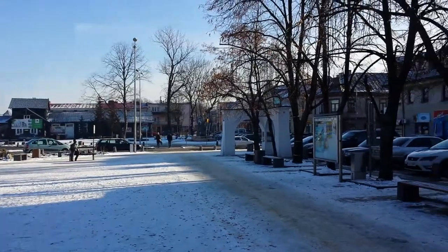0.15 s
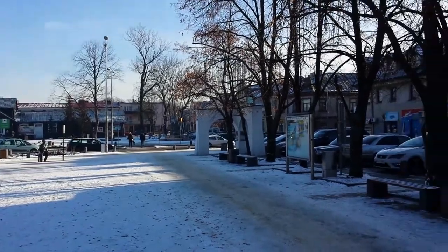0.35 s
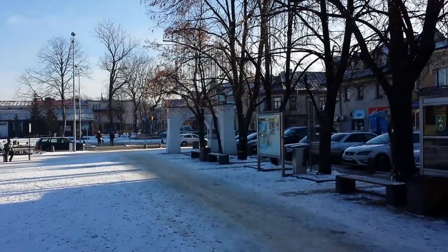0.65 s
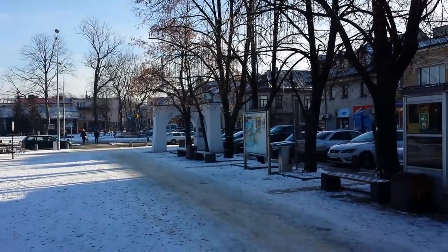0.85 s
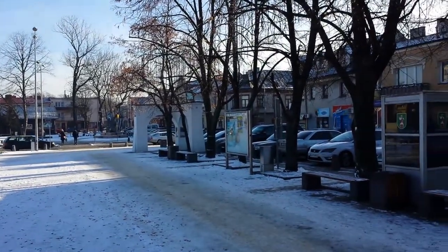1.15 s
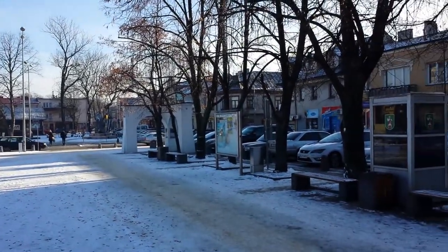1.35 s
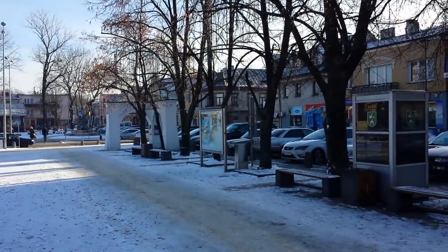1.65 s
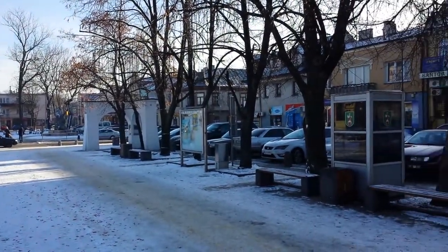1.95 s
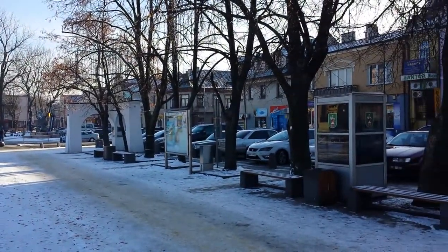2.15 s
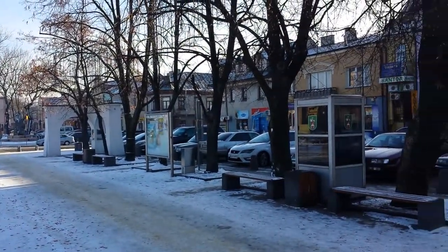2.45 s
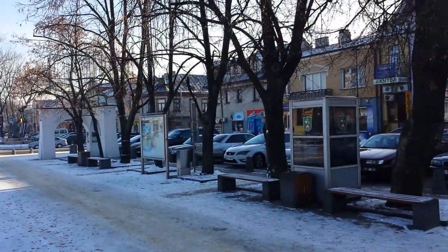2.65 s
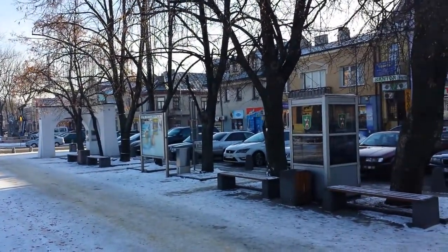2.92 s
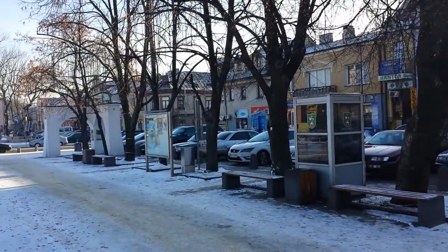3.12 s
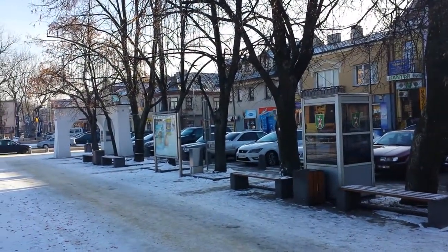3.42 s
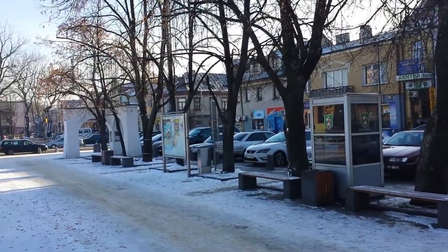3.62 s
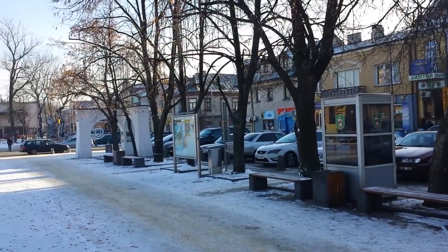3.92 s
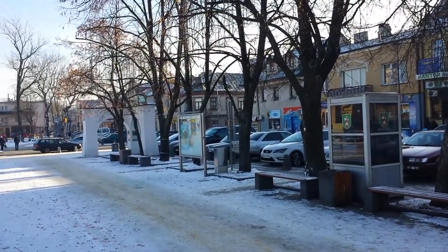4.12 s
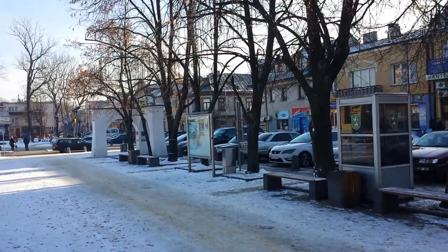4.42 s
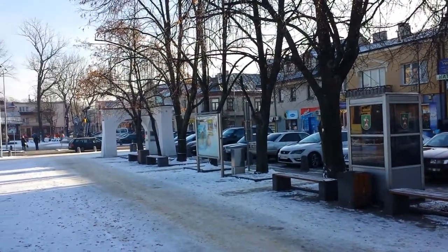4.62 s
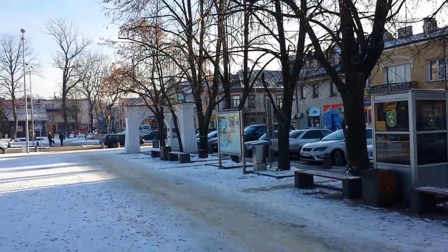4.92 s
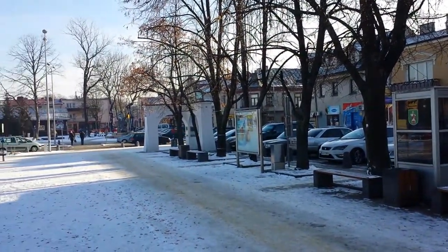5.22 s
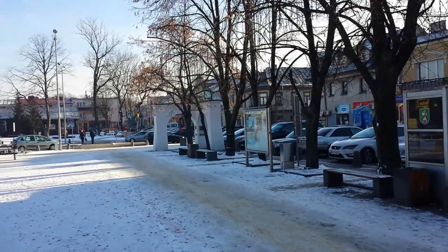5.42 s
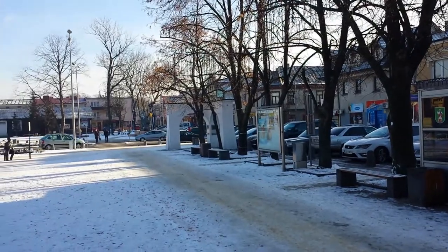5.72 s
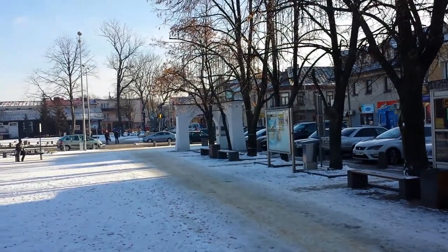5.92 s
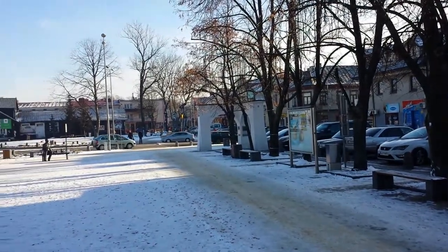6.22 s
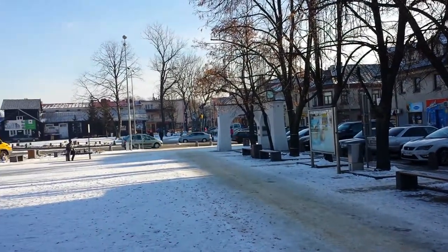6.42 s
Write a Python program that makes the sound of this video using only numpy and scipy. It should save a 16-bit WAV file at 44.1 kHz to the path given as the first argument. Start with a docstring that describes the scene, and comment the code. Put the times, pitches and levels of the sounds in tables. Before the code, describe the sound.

Soft steady road traffic rumbles beyond a snowy square while wind buffets the microphone mid-way and a small bird chips brightly near the end.

```python
"""Road traffic rumbles and hisses beyond a snowy town square: shaped noise, with wavering tones for engines.
Puffs of wind buffet the two microphone ports of a hand-held camera as lumpy noise; single eddies slap them.
A tit on the right repeats a quick low-high-low call of gliding chips, with echoes from the square.
Far-off jackdaws yelp and small birds whistle in gliding or fluttering tones.
Fine noise hisses, the camera whirrs in pulses of high noise, and a dry double tick snaps nearby."""
import sys
import numpy as np
from scipy import signal
from scipy.fft import rfft, irfft
from scipy.io import wavfile
from scipy.ndimage import uniform_filter1d

SR = 44100
rng = np.random.default_rng(int(sys.argv[2]) if len(sys.argv) > 2 else 0)


def generate_wav(signal):
    """Clip the signal to [-1, 1] and save it as 16-bit WAV at the path in sys.argv[1]."""
    frames = np.transpose(np.atleast_2d(signal))
    scaled = np.clip(frames, -1, 1) * 32767
    pcm = np.round(scaled).astype(np.int16)
    wavfile.write(sys.argv[1], SR, pcm)


N = 289799
TIME = np.arange(N) / SR
BINS = np.maximum(np.arange(N // 2 + 1) * SR / N, 1)   # frequencies of the spectrum, Hz
TREES_T60_S = 0.93   # time in which the scatter behind the small birds fades by 60 dB


def from_db(db):
    """Turn decibels into a gain."""
    return 10 ** (np.asarray(db) / 20)


def rms_one(x):
    """Scale to an rms (average strength) of 1."""
    return x / np.sqrt(np.mean(x ** 2) + 1e-20)


def over_hz(rows):
    """Join up each column of a table along log frequency."""
    hz, *columns = np.transpose(rows)
    return np.array([np.interp(np.log(BINS), np.log(hz), column) for column in columns])


def filtered(x, hz, kind, order=2):
    """Keep only part of the frequency range, with a Butterworth filter."""
    sections = signal.butter(order, np.clip(hz, 10, .45 * SR), kind, fs=SR, output="sos")
    return signal.sosfilt(sections, x + 1e-18)


def drift(rate_hz):
    """Smooth random wander with an rms of 1; a higher rate wanders faster."""
    spectrum = rfft(rng.standard_normal(N))
    return rms_one(irfft(spectrum / (1 + (BINS / rate_hz) ** 2), N))


def tone_phase(hz):
    """Add up a changing pitch into the phase of a tone."""
    return 2 * np.pi * np.cumsum(hz) / SR


def diffuse(spectrum):
    """Noise from all round: ports a hand's length apart hear mid tones in opposite phase."""
    # how alike the two ports sound: f/Hz, left-right correlation (1 same, -1 opposite)
    likeness = [(30, .7), (330, .72), (600, .45), (850, .25), (1100, -.05), (1450, -.6), (1900, .3),
                (2200, .4), (2650, .08), (3450, .25), (4200, -.2), (5000, 0), (15000, 0)]
    mid, side = rfft(rng.standard_normal((2, N)))
    alike = np.clip(over_hz(likeness)[0], -1, 1)
    shared = np.sqrt((1 + alike) / 2) * mid
    opposed = np.sqrt((1 - alike) / 2) * side * [[1], [-1]]
    return irfft((shared + opposed) * from_db(over_hz(spectrum)) * np.sqrt(SR / 2), N)


def gate(start, length, edge):
    """A window in time with soft edges."""
    opening = np.tanh((TIME - start) / edge)
    closing = np.tanh((TIME - start - length) / edge)
    return (opening - closing) / 2


def square_scatter(x, t60):
    """Scatter from trunks and house fronts: a fading noise tail, different at each port."""
    t = TIME[:SR]
    tail = rng.standard_normal((2, SR)) * from_db(-60 * t / t60)
    tail /= np.sqrt(np.sum(tail ** 2) / 2)
    return signal.fftconvolve(x[None], tail, axes=1)[:, :N]


def traffic(engine_share=0.15, waver_db=1.5, split_hz=400):
    """Engines fill the bass and tyres the middle; the tyres swell as cars roll by."""
    # traffic spectrum before the swells: f/Hz, left level/dB per Hz, right level/dB per Hz
    road_spectrum = [(20, -67, -68), (30.5, -53, -48.5), (60, -52.5, -51.5), (80, -59, -57),
                     (129, -64.5, -63), (227, -68.5, -68), (357, -75.5, -74.5), (516, -83.5, -82.5),
                     (700, -80, -80.5), (1210, -80.5, -80.5), (1430, -81.5, -83), (1790, -79.5, -82),
                     (2235, -87, -89.5), (15800, -125, -125)]
    # engine rumble, before centring on its median and scaling by engine_share: t/s, level/dB
    rumble = [(0.0, -25), (0.13, -48), (2.63, -34), (3.6, -39), (4.79, -26.5), (6.57, -39.5)]
    # tyre noise against the road spectrum: t/s, level/dB
    tyre_levels = [(0, -0.6), (1.25, -1.5), (2.3, -0.5), (3.2, .5), (4.2, 0.05), (5.2, -0.4), (6.57, 0.6)]
    road = diffuse(road_spectrum)
    engines = irfft(rfft(road) / (1 + (BINS / split_hz) ** 4), N)
    tyres = road - engines
    s, engine_db = np.transpose(rumble)
    engine_swell = engine_share * np.interp(TIME, s, engine_db - np.median(engine_db))
    tyre_swell = np.interp(TIME, *np.transpose(tyre_levels))
    engines = engines * from_db(engine_swell + waver_db * drift(9.8))
    return engines + tyres * from_db(tyre_swell + 0.88 * drift(18))


def engine_notes():
    """Engines heard by their pitch: wavering pure tones, some throughout, others coming and going."""
    # engine notes and whines: t/s, length/s, f/Hz, level/dB, left-right/dB, waver/share of pitch
    notes = [(0.9, 0.53, 96, -40.5, 3, 0.0061), (5, 0.084, 62, -28, -1, 0.0062),
             (5.5, 1.8, 511, -65.5, 5, 0.0038), (0, 6.8, 58, -40, 1, 0.03995),
             (0, 7.3, 234, -57.5, 0, 0.01614), (3.5, 1.4, 127, -52.5, 0, .02),
             (3.5, 0.41, 232, -50.5, 2, .02)]
    out = np.zeros((2, N))
    for s, length, hz, db, pan, waver in notes:
        phase = tone_phase(hz * (1 + waver * drift(4.97)))
        note = from_db(db) * gate(s, length, length / 8) * np.sqrt(2) * np.sin(phase)
        out += note * from_db([[pan / 2], [-pan / 2]])
    return out


def fine_hiss():
    """Steady fine noise, lifted by the resonance of the ports, with a slight flicker in level."""
    # hiss spectrum before the flicker: f/Hz, left level/dB per Hz, right level/dB per Hz
    hiss_spectrum = [(1490, -104, -104), (3430, -94, -89.5), (4900, -90, -90), (5350, -96.5, -87.5),
                     (6190, -92.5, -86.5), (8230, -97.5, -103.5), (8000, -99, -101), (10370, -105, -108),
                     (12100, -108, -110), (15700, -110, -111)]
    return diffuse(hiss_spectrum) * from_db(0.94 * drift(60.0))


def camera(low_hz=7000, high_hz=7400, first_s=0.012, steady=0.22):
    """The lens drive gives a tiny high whirr: a narrow noise band that pulses thirty times a second."""
    # whirr at the top of each pulse, before the port balance: t/s, level/dB
    whirr = [(0, -66), (.5, -64), (1.25, -72), (2.3, -60), (3.3, -59), (4.2, -64.5), (5.5, -66), (6.3, -62)]
    beat = (.5 + .5 * np.cos(2 * np.pi * 30 * (TIME - first_s))) ** 2
    ring = rms_one(filtered(rng.standard_normal(N), [low_hz, high_hz], "band"))
    level = from_db(np.interp(TIME, *np.transpose(whirr)))
    return level * (steady + (1 - steady) * beat) * ring * from_db([[-1], [1]])


def slaps(width_s=0.0045):
    """One eddy crosses a port: a push that flips to suction, the sharper the brighter."""
    # single large eddies: t/s of the flip, level/dB before the fade, front/s, port (0 left, 1 right)
    slap_rows = [(0.027, -19, 0.0027, 1), (0.378, -11, 0.0016, 1), (0.41, -9.5, 0.0033, 1),
                 (0.491, -21, 0.0023, 1), (1.25, -12.5, 0.0017, 0), (2.468, -8, 0.00049, 1),
                 (2.612, -9, 0.00051, 1)]
    out = np.zeros((2, N))
    for s, db, front_s, side in slap_rows:
        age = TIME - s
        out[int(side > .5)] -= from_db(db) * np.tanh(age / front_s) * np.exp(-(age / width_s) ** 2)
    return out


def whistles(left_db=-7, wet_db=-3, waver=0.017, shake=0.33):
    """Small birds farther off: held, fluttering tones, blurred by the square."""
    # thin whistles, before flutter in level and port balance: t/s, length/s, f/Hz, level/dB
    whistle_rows = [(0.153, 0.074, 3280, -56), (0.428, 0.061, 5680, -56), (0.735, 0.1, 5740, -54),
                    (1.58, 0.05, 4700, -56), (3.027, .05, 4600, -56.5), (3.655, 0.033, 4700, -55),
                    (3.84, 0.032, 4700, -58), (4.55, .06, 5780, -59)]
    notes, flutter = np.zeros(N), drift(227)
    tremor = rms_one(np.exp(shake * drift(45)))
    for s, length, hz, db in whistle_rows:
        tone = np.sin(tone_phase(hz * (1 + waver * flutter)))
        notes += from_db(db) * gate(s, length, length / 8) * tremor * tone
    scatter = from_db(wet_db) * square_scatter(notes, TREES_T60_S)
    return (notes + scatter) * from_db([[left_db], [0]])


def eddies(low_hz, high_hz, knee_hz):
    """Lumpy pressure of turbulence: low band noise, evened out in strength."""
    lumps = filtered(rng.standard_normal(N), high_hz, "low", order=4)
    lumps = filtered(lumps, low_hz, "high", order=2)
    lumps = filtered(lumps, knee_hz, "low", order=1)
    return lumps / np.sqrt(uniform_filter1d(lumps ** 2, size=1500) + 1e-12)


def wind(small_db=-9, finest_db=-19.5, full_db=-16, growth=1.46, edge_s=0.0018, lumpy_db=5.0, lee_db=-21):
    """Each port has its own eddies; a harder puff sheds smaller, brighter ones."""
    # broad gusts from the right, before their surges: peak t/s, half width/s, level/dB
    gusts = [(2.6, 0.37, -34), (4.68, 0.38, -38.5)]
    # short puffs: t/s, length/s, level/dB, port (0 left, 1 right), extra small eddies/dB
    puffs = [(0.355, 0.039, -28.5, 1, -7), (0.47, 0.036, -28.5, 1, -8), (1.05, .42, -46, 0, -10),
             (1.234, .03, -32, 0, -7), (1.749, 0.055, -35, 0, 2), (1.936, 0.035, -23.5, 1, -23),
             (2.161, 0.029, -28, 1, 0), (2.285, 0.0346, -24, 1, 6), (2.466, 0.01, -14, 1, 2),
             (2.481, 0.021, -12.5, 1, -7.5), (2.506, 0.0091, -17, 1, 8), (2.522, 0.015, -17, 1, 5),
             (2.54, 0.0092, -15.5, 1, 0), (2.551, 0.027, -12.5, 1, -3), (2.58, 0.019, -20, 1, 8.5),
             (2.618, 0.01, -15, 1, 1.5), (2.629, 0.024, -23, 1, -3), (2.708, 0.02, -25, 1, -1),
             (2.733, 0.0124, -23, 1, 5.5), (2.752, 0.018, -25.5, 1, -1), (2.85, 0.0435, -22, 1, 0),
             (2.927, 0.012, -21, 1, -20), (2.966, 0.012, -22.5, 1, -16), (3.003, 0.029, -25, 1, -15),
             (3.055, 0.039, -27, 1, -12), (4.676, 0.032, -25.5, 1, 6.5), (4.747, 0.054, -23, 1, -13)]
    force, fine = np.zeros((2, 2, N))   # drive of the large and small eddies at each port
    surges = from_db(lumpy_db * np.clip(drift(6.7), -2, 1.5))
    for s, width, db in gusts:
        push = from_db(db - full_db) * np.exp(-((TIME - s) / width) ** 2) * surges
        force[1] = np.hypot(force[1], push)
        fine[1] = np.hypot(fine[1], push ** growth)
    for s, length, db, side, extra_db in puffs:
        port = int(side > .5)
        push = from_db(db - full_db) * np.abs(gate(s, length, edge_s))
        force[port] = np.hypot(force[port], push)
        fine[port] = np.hypot(fine[port], from_db(extra_db) * push ** growth)
    # the left port, in the lee, gets a weak share of the wind on the right
    force[0] = np.hypot(force[0], from_db(lee_db) * force[1])
    ports = []
    for large_gain, small_gain in zip(force, fine):
        large = eddies(46.3, 186.0, 101)
        small = from_db(small_db) * eddies(175, 324, 94)
        small += from_db(finest_db) * large_gain * eddies(420, 555, 86)
        riding = 0.44 + 0.57 * np.abs(large)   # small eddies ride on the large ones
        ports.append(large_gain * large + small_gain * small * riding)
    return from_db(full_db) * np.array(ports)


def jackdaws(left_db=-5, octave_db=-14, wet_db=-6, arch=0.125):
    """Distant yelps: a tone and its octave that arch and glide in pitch."""
    # calls, before the port balance: t/s, length/s, mid-call f/Hz, glide/share of pitch, level/dB
    call_rows = [(1.449, 0.096, 970, 0.061, -53), (1.73, 0.047, 844, -0.058, -49),
                 (2.047, 0.08, 728, -0.021, -53), (2.996, 0.078, 670, 0.085, -51),
                 (3.079, 0.12, 1095, -0.064, -50.5), (3.193, 0.13, 1266, -0.019, -55.5),
                 (3.673, 0.056, 1250, 0.041, -51), (4.587, 0.1, 1215, -0.1, -57)]
    calls, flutter = np.zeros(N), drift(116)
    for s, length, middle_hz, glide, db in call_rows:
        at = np.flatnonzero((TIME > s) & (TIME < s + length))
        u = np.linspace(-.5, .5, len(at))   # place within the call
        hz = middle_hz * (1 + glide * u - arch * u ** 2) * (1 + 0.032 * flutter[at])
        phase = tone_phase(hz)
        tone = np.sin(phase) + from_db(octave_db) * np.sin(2 * phase)
        calls[at] += from_db(db) * np.cos(np.pi * u) * tone
    return calls * from_db([[left_db], [0]]) + from_db(wet_db) * square_scatter(calls, 0.34)


def tit(voice_db=-3.0, octave_db=-24, wall_db=-13, echo_db=-18, wet_db=-5.0, top_hz=11000,
        attack_s=0.007, sag=0.4, trill_hz=270, trill=0.49, grain=0.19):
    """Arched, trilled chips, raspy ones jagged in pitch; the square adds two echoes and a tail."""
    # chips, mostly in low-high-low runs, level before voice_db and rasp before a 1 dB lift:
    # t/s, length/s, f/Hz, fall/share of pitch, level/dB, rasp/dB, left-right/dB
    chips = [(1.504, .012, 4750, -0.011, -51, -18, -5), (1.654, 0.009, 4620, 0.0081, -42, -18, -16),
             (2.073, 0.013, 5840, -0.044, -42, -5.5, -11), (2.179, .014, 4870, 0.023, -47, -14, -12),
             (2.245, 0.019, 5560, 0.08, -46, -0.5, -12), (2.322, 0.034, 4670, 0.016, -48, -8, -19),
             (4.684, 0.013, 4640, -0.042, -39.5, -18, -12), (4.752, 0.031, 5650, 0.022, -43, -2.5, -10),
             (4.829, 0.025, 4480, 0.1, -39.5, -8, -12), (4.864, 0.022, 4480, 0.0041, -43.5, -4, -13),
             (4.94, 0.018, 5650, 0.081, -46.5, 1.5, -9), (5.014, 0.03, 4380, 0.07, -41.5, -7, -15),
             (5.201, 0.0186, 4450, -0.24, -43, -5.5, -3), (5.272, .025, 5660, 0.11, -37.5, -8, -7),
             (5.38, 0.012, 4570, -0.049, -36.5, -12, -14), (5.449, 0.022, 5750, 0.02, -35, -11.5, -7),
             (5.522, 0.016, 4750, -0.0018, -43.5, -14, -10), (5.553, 0.012, 4600, -.02, -37, -18, -15),
             (5.563, .008, 4600, -0.028, -44, -18, -15), (5.624, 0.018, 5740, .04, -41, -6, -9),
             (5.699, 0.015, 4550, 0.031, -41.5, -10, -16), (5.873, 0.013, 4554, 0.054, -45.5, -1, -24),
             (6.063, .009, 4630, 0.038, -31, -18, -18), (6.135, 0.019, 5590, .09, -32, -12.5, -13),
             (6.208, 0.022, 4660, 0.045, -32.5, -20, -17), (6.244, 0.012, 4750, 0.11, -39.5, -5, -11),
             (6.256, .01, 4450, 0.023, -42, -14, -11), (6.318, 0.013, 5580, 0.045, -30.5, -9, -17),
             (6.331, 0.012, 5620, 0.037, -40, -5, -19), (6.388, 0.022, 4540, 0.013, -35, -15, -9),
             (6.426, 0.02, 4470, -0.0039, -36.5, -20, -10), (6.499, 0.017, 5650, -0.055, -36, -7.5, -17)]
    arch, jag = 0.037, 0.033   # rise in mid-note and jitter at 0 dB rasp, as shares of the pitch
    port_lag_s = 0.00021   # the direct song reaches the left port later
    wall_echo_s, house_echo_s = 0.0091, 0.033
    dry, song = np.zeros((2, N)), np.zeros(N)
    flutter = drift(450)
    trill_phase = tone_phase(trill_hz * (1 + 0.246 * drift(91.2)))
    tremor = (1 + trill * np.sin(trill_phase)) * np.exp(grain * drift(150))
    rasp = rms_one(filtered(rng.standard_normal(N), [3500, 6500], "band", order=2))
    for s, length, hz, fall, db, rasp_db, pan in chips:
        at = np.flatnonzero((TIME > s - attack_s / 2) & (TIME < s + length))
        u = np.linspace(0, 1, len(at))   # place within the chip
        attack = np.minimum((TIME[at] - TIME[at[0]]) / attack_s, 1) ** 1.4
        swell = attack * (1 - u ** 2) ** abs(sag) * tremor[at]
        bend = fall * (.5 - u) + arch * (np.sin(np.pi * u) - .7)
        jitter = jag * from_db(rasp_db / 2) * flutter[at]
        phase = tone_phase(hz * (1 + bend + jitter))
        tone = np.sin(phase) + from_db(octave_db) * np.sin(2 * phase)
        tone += from_db(rasp_db + 1.0) * rasp[at] * np.sin(np.pi * u) ** 2
        note = from_db(db + voice_db) * swell * tone
        dry[:, at] += np.sqrt(2) * note * from_db([[pan], [0]])
        song[at] += note
    dry[0] = np.interp(TIME - port_lag_s, TIME, dry[0])
    wall = from_db(wall_db) * np.interp(TIME - wall_echo_s, TIME, song)
    house = from_db(echo_db) * np.interp(TIME - house_echo_s, TIME, song)
    tail = from_db(wet_db) * square_scatter(song, TREES_T60_S)
    heard = dry + (wall + house + tail) * from_db([[-2.5], [2.5]])
    return filtered(heard, top_hz, "low", order=8)


def ticks(decay_s=0.001, wet_db=-3, t60_s=0.36):
    """A small dry double tick nearby: two sharp noise snaps with a short scatter behind them."""
    # snaps, level before the fade and filter: t/s, level/dB, left-right/dB
    snaps = [(3.2702, -28, 6), (3.278, -31, -1)]
    out = np.zeros((2, N))
    for s, db, pan in snaps:
        snap = rng.standard_normal(N) * (TIME > s) * np.exp(-np.abs(TIME - s) / decay_s)
        snap = filtered(snap, [1500, 5700], "band", order=4)
        out += from_db(db) * snap * from_db([[pan / 2], [-pan / 2]])
    return out + from_db(wet_db) * square_scatter(out.mean(axis=0), t60_s)


def scene():
    """Add the traffic, hiss and camera to the wind, birds and ticks."""
    background = traffic() + engine_notes() + fine_hiss() + camera()
    birds = whistles() + jackdaws() + tit()
    return background + slaps() + wind() + birds + ticks()


def record(dry, cutoff_hz=15700):
    """The sound opens softly and the top is cut steeply."""
    opening = np.minimum(TIME / .004, 1)
    steep_cut = signal.ellip(12, .1, 90, cutoff_hz, fs=SR, output="sos")
    return signal.sosfilt(steep_cut, dry * opening)


dry = scene()
out = record(dry)
generate_wav(out)
```